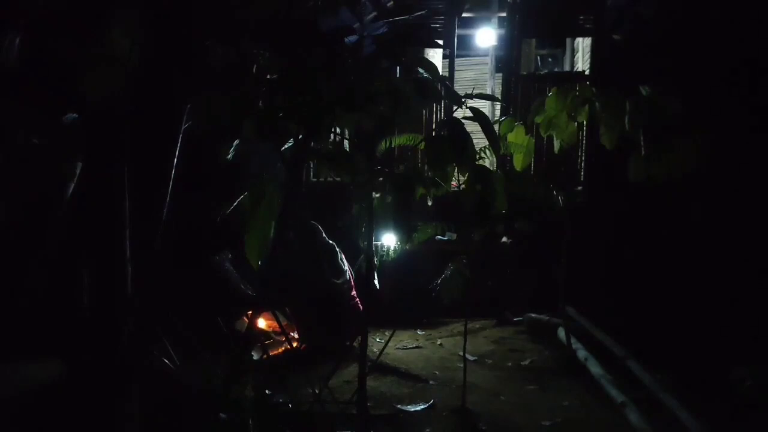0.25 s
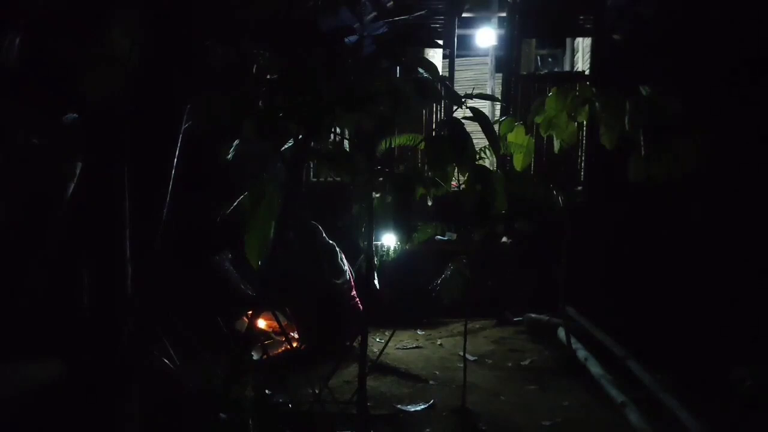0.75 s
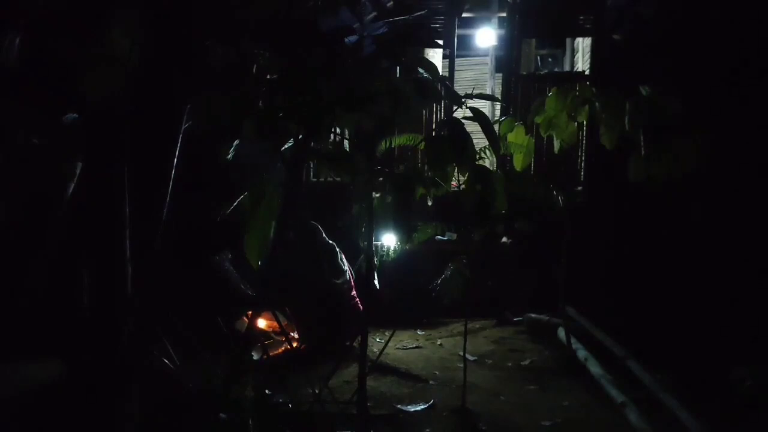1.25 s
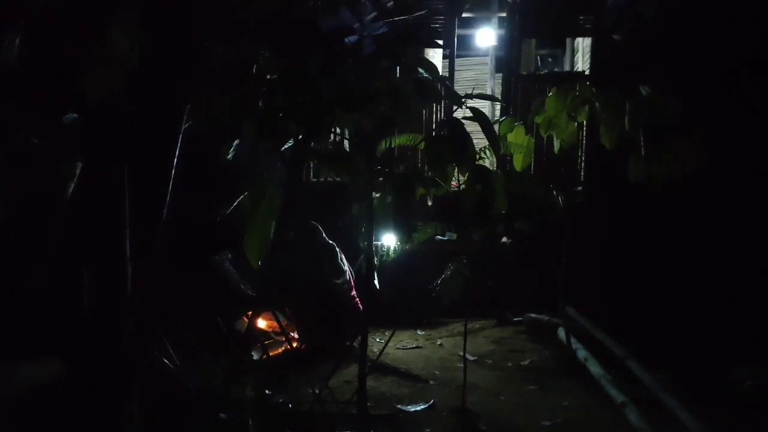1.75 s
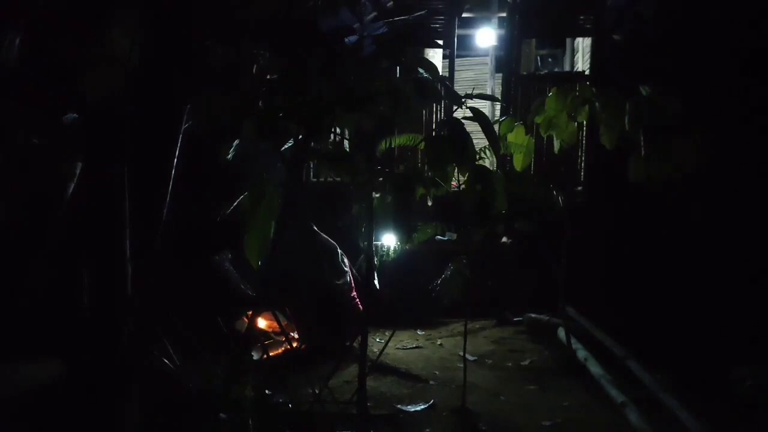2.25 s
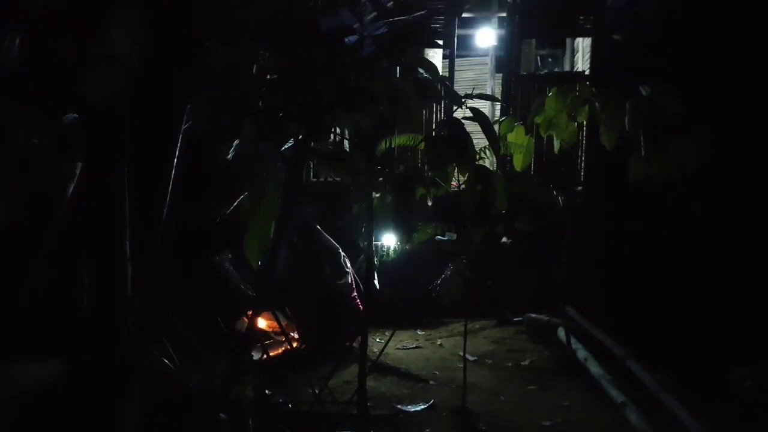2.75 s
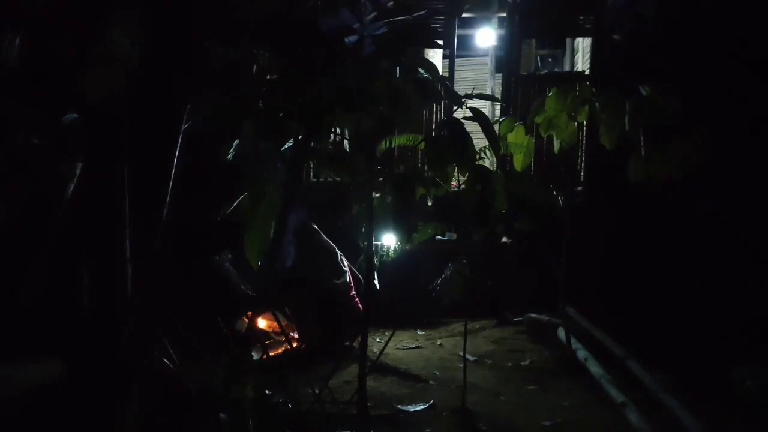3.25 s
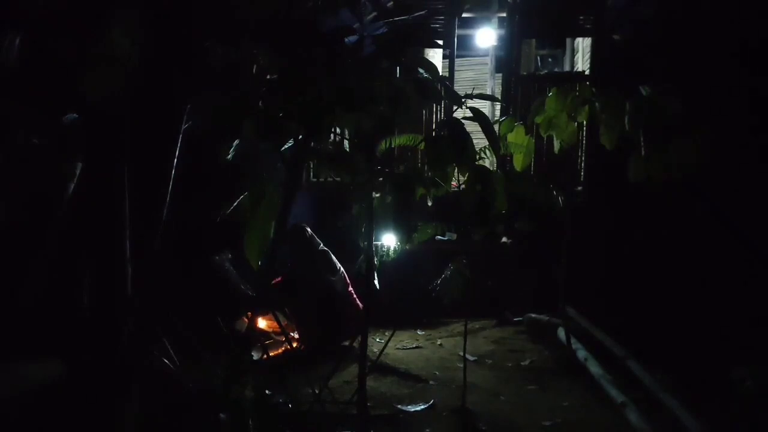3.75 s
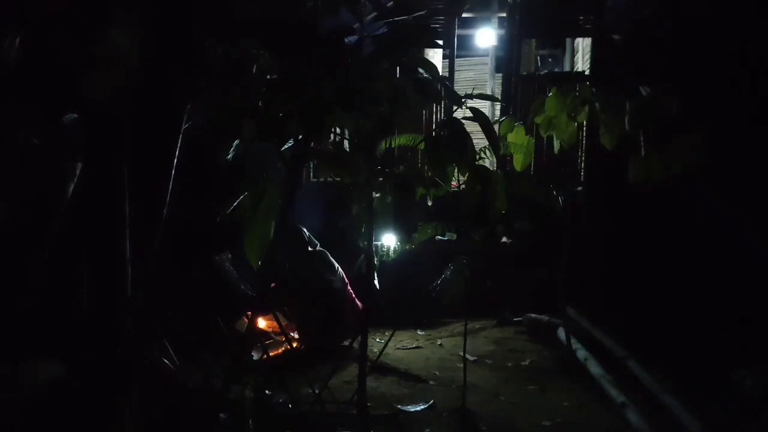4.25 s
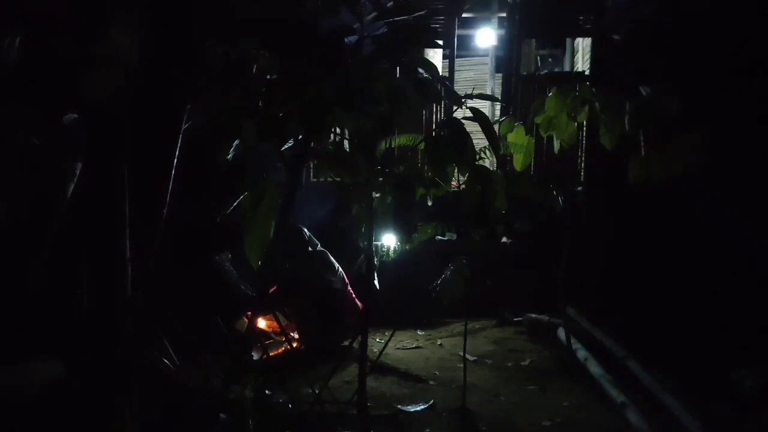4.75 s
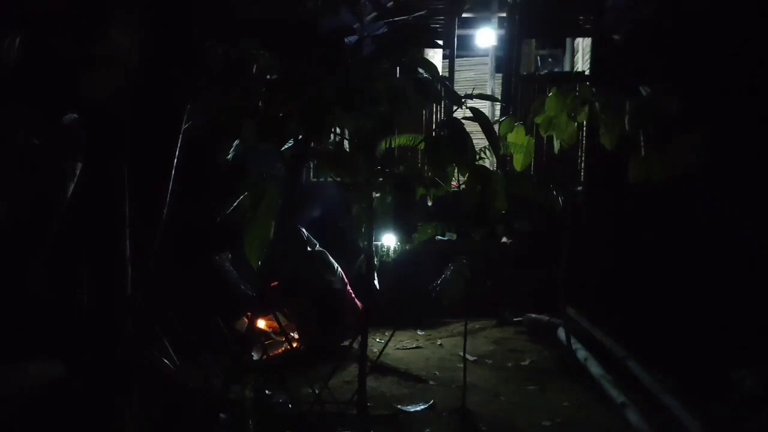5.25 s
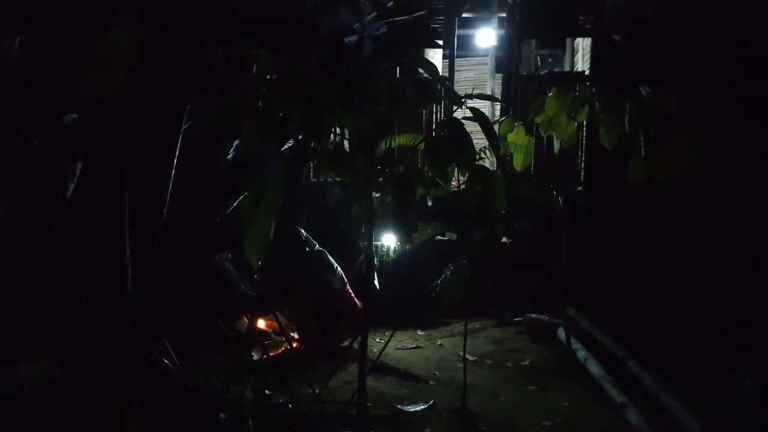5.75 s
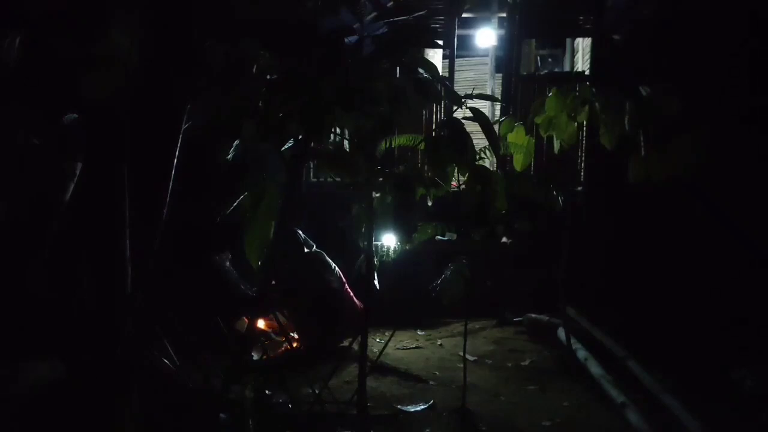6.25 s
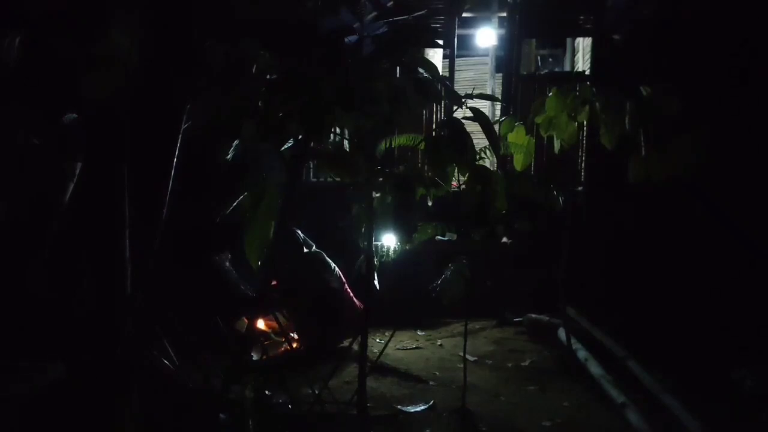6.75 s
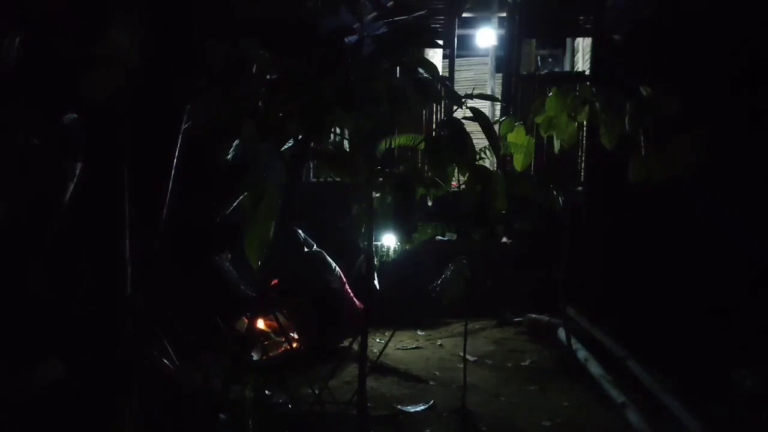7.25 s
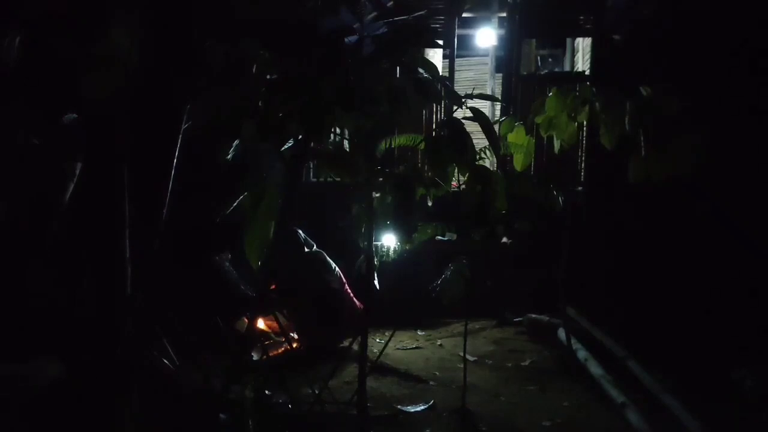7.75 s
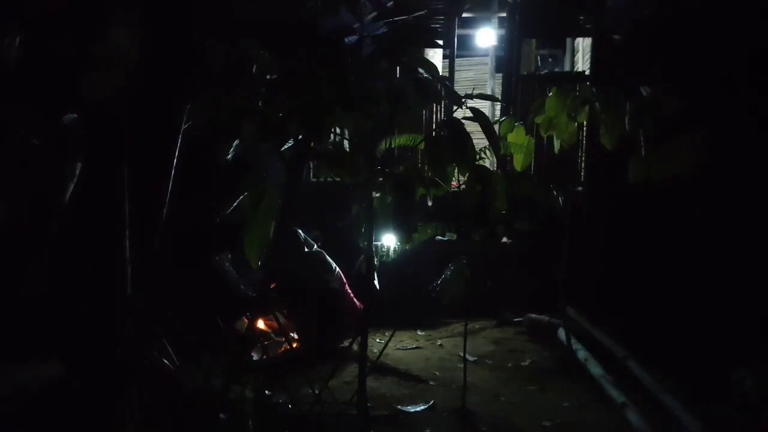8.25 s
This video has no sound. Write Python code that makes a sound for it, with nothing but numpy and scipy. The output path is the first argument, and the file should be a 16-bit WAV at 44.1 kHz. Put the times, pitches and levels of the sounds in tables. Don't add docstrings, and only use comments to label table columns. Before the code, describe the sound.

A leafy yard at night, heard in stereo. Throughout, two field crickets a few metres to the right sing around 5.3 kHz, each repeating chirps of two or three very short falling strokes roughly every 0.2 seconds. They overlap and slip against each other; one rests from about 4.3 to 5.5, the other pauses from 0.4 to 1.0 and 7.6 to 8.3. Weaker neighbours fill gaps. Behind, steady trills shimmer, strongest near 4.6 and 5.7 kHz, with distant crickets and soft air hiss. Very faint rubs occur near 0 and 1.1. Hollow fingertip taps and short rubs begin around 4.1, with clear knocks near 4.8, 5.15 and the sharpest at 6.4, then a loose cluster of taps and rubbing from 7.2 to 8.2. Tiny dry twig ticks are scattered, clearest at 5.15 and 8.2. Leaves rustle very softly after 6.5, fullest near 8.1.

```python
import sys
import numpy as np
from scipy import signal
from scipy.fft import rfft, irfft
from scipy.io import wavfile
from scipy.ndimage import uniform_filter1d

SR = 44100
rng = np.random.default_rng(int(sys.argv[2]) if len(sys.argv) > 2 else 0)


def materialize(psi):
    bounded = np.clip(np.atleast_2d(psi).T, -1, 1)
    quanta = np.round(bounded * 32767).astype(np.int16)
    wavfile.write(sys.argv[1], SR, quanta)


def amp(db):
    return 10 ** (np.asarray(db, float) / 20)


N = 374409

# (frequency [Hz], density [dB per Hz])
AIR_SPECTRUM = [(20, 1), (60, -8.5), (160, -8.5), (350, -16.5), (700, -17), (1300, -14), (2200, -14),
                (3450, -10), (3750, -3.5), (4200, -4.5), (5500, -1), (6050, -14), (7200, -14), (9200, -16),
                (10500, -18.5), (15500, -25)]
AIR_DB = -52
# (time [s], level [dB])
RUSTLE_SWELL = [
    (5.5, -101),
    (6.5, -72.5),
    (7.2, -61),
    (8.1, -58),
    (8.6, -61.5),
]
# (wing pitch [Hz], spread [Hz], fall in a stroke [Hz], strokes [per s], level [dB],
# left minus right [dB])
TRILLS = [
    (1817, 176, 470, 45, -77, 24),
    (2817.5, 77, 219, 52, -61, -0.5),
    (3291, 40, 60, 38, -74.5, -4),
    (4193, 80, 240, 43, -61, -3.5),
    (4630, 122.6, 303, 36, -45.5, -1.5),
    (6450, 33, 96, 7.7, -71.5, 5.5),
    (6746, 86, 95, 43, -67, -6),
    (7200, 84, 220, 21, -70, 2),
    (7500, 200, 210, 50, -69, 0),
    (8910, 230, 720, 54, -74.5, 8),
]
TREE_CRICKETS = (5706, 13, 78, 40, -53, 3.5)
# (time [s], peak level [dB])
TWIG_TICKS = [
    (0.9248, -59),
    (2.3795, -58),
    (3.7389, -52),
    (5.1514, -45),
    (5.8775, -54),
    (6.2913, -58),
    (6.415, -51),
    (8.1638, -48),
    (8.315, -50),
]
# (time [s], peak level [dB], low modes [dB], middle modes [dB], upper modes [dB]),
# the modes against the peak
TAPS = [(0.034, -62, 17, -16, -14.5), (4.14, -48, 13, 7.5, -7), (4.173, -45.5, 2, -4, -17),
        (4.421, -42, -8, -11.5, -23), (4.77, -37, -15, 0.5, -10), (4.8, -49, -12, -4, -7),
        (4.858, -52.5, 6, -20, -22), (4.92, -56, -9, -15, -20), (5.151, -30, -29, -1, -10.5),
        (5.175, -52, -15, -14, 2), (5.197, -59, -15, -7, 4), (5.238, -58.5, -15, -1, 2),
        (6.416, -25.5, -11, -15.5, -26.5), (6.444, -67, -20, -20, -22), (6.837, -48, -22, -10, -24),
        (7.187, -57, -28, -19, -15), (7.198, -50.5, -22, -23, -35), (7.328, -68, -15, 2, -13),
        (7.36, -66, -15, -9, -17), (7.417, -49, -28, -18, -11), (7.545, -39.5, -25, -16, -34),
        (7.595, -34.5, -7, -22, -23), (7.656, -47, -17, -16, -18), (7.677, -47, -15, -13, -17),
        (7.694, -63, -15, 10.5, -20), (7.787, -44, 9.5, -13, -15), (7.856, -43.5, 5.5, -15, -19),
        (7.927, -59, -15, -13, -22), (8.001, -65, -15, -15, -15), (8.094, -60, -20, -15, -4),
        (8.143, -51, -16, -16, -16), (8.189, -52.5, -18, -15, -5), (8.2, -39, -28, -7.5, -24)]
# (time [s], hold [s], level [dB])
RUBS = [(0.032, 0.056, -61), (1.065, 0.099, -66), (1.207, 0.069, -72), (4.18, 0.017, -49),
        (4.274, 0.022, -59.5), (4.323, 0.008, -50), (4.355, 0.007, -52), (4.402, 0.0066, -60),
        (4.436, .01, -64.5), (4.813, 0.017, -53.5), (4.861, 0.014, -63), (5.19, .008, -65),
        (5.25, 0.011, -64), (6.43, 0.0073, -63), (6.503, 0.022, -68), (7.245, 0.02, -65.5),
        (7.34, 0.12, -62.5), (7.512, 0.063, -62), (7.625, .02, -62), (7.709, 0.05, -58.5),
        (7.783, 0.049, -54.5), (7.877, 0.045, -60), (7.998, 0.09, -60), (8.113, 0.074, -59),
        (8.2, 0.035, -54.5)]
RUB_RISE_DB_PER_S, RUB_FADE_DB_PER_S = 1200, 696
# (frequency [Hz], level [dB], t60 [s])
MOUNT_LOW = [(453, -19, 0.045), (514, -19.5, 0.051), (606, -42, 0.05), (857, -9, 0.067), (913, -14, 0.048),
             (1058, 3.5, 0.014), (1180, -7, 0.023)]
MOUNT_HIGH = [(1504, -5, 0.021), (1750, 7, 0.025), (1923, 3.5, 0.034), (2140, -1.5, 0.019),
              (2380, -2, 0.044), (2750, 11, 0.021), (3184, 5, 0.044)]
THUD = [(680, -62, 0.004), (1340, -19.5, 0.0087), (2080, -15.5, 0.0069)]
GRIPS = [(802, -13.5, 0.05), (844, -4, 0.072), (950, -7, 0.027)]
# (time [s], strokes [count], peak level [dB])
NEIGHBOURS = [(0.08, 1, -37), (0.146, 1, -37), (0.217, 3, -37), (0.425, 1, -36), (0.576, 4, -36),
              (0.857, 1, -34), (1.175, 1, -33), (1.282, 1, -33), (1.381, 1, -33), (1.586, 1, -33),
              (1.73, 3, -36), (1.887, 2, -35), (1.992, 1, -33), (2.177, 2, -34), (2.529, 2, -35),
              (2.836, 1, -34), (2.954, 2, -35), (3.135, 1, -32), (4.35, 1, -36), (4.669, 2, -37),
              (4.757, 1, -28), (4.854, 4, -36), (5.068, 3, -36), (5.285, 2, -37), (5.495, 3, -35),
              (5.918, 3, -37), (7.551, 2, -37), (7.682, 3, -38), (7.859, 2, -37), (8.075, 2, -36)]
# (time [s], first stroke [dB], second stroke [dB], third stroke [dB])
CHIRPS_A = [(0.717, -27.5, -27, -29), (0.99, -28, -31, -32), (1.221, -25.5, -26, -50),
            (1.416, -27.5, -28, -27), (1.644, -26.5, -31, -51), (1.841, -27, -29.5, -49),
            (2.037, -31, -31, -27), (2.272, -27.5, -29, -51), (2.467, -27, -25.5, -46),
            (2.664, -27.5, -25, -28.5), (2.893, -29.5, -27, -46), (3.089, -28, -26.5, -48),
            (3.286, -28, -29, -26), (3.515, -29, -26.5, -40), (3.716, -28, -29, -45),
            (3.914, -27, -25, -36), (4.153, -31, -29.5, -53), (5.513, -30.5, -29.5, -30),
            (5.713, -26.5, -27.5, -28), (5.943, -27.5, -29, -46), (6.141, -27.5, -25.5, -28),
            (6.372, -26.5, -30, -34), (6.569, -28, -26.5, -43), (6.769, -26.5, -26.5, -43),
            (6.967, -26.5, -27.5, -47), (7.164, -27, -26, -27), (7.395, -25, -28.5, -29.5),
            (7.593, -28, -30.5, -51), (7.791, -30.5, -28.5, -50), (7.99, -30, -27.5, -29.5)]
CHIRPS_B = [(0.034, -28, -27, -47), (0.239, -25, -25.5, -40), (1.003, -25, -27, -27.5),
            (1.21, -30, -26.5, -51), (1.416, -29, -26, -34), (1.62, -28, -25, -45),
            (1.824, -27.5, -25, -42), (2.026, -27, -21.5, -47), (2.229, -28, -27.5, -47),
            (2.435, -33, -33, -41), (2.631, -35, -28, -25), (2.871, -29, -26, -27), (3.168, -27, -25, -51),
            (3.372, -30, -25.5, -36), (3.575, -38, -30, -53), (3.778, -29, -26.5, -42),
            (3.981, -29, -33.5, -44), (4.183, -24, -35, -54), (4.385, -27, -25, -58),
            (4.587, -31, -23.5, -36), (4.789, -30, -26, -54), (4.993, -28.5, -40, -38),
            (5.163, -28, -26.5, -47), (5.366, -25, -32, -35), (5.602, -28, -29, -45),
            (5.804, -37, -29, -33), (6.006, -32, -30, -37), (6.209, -25, -44, -40), (6.406, -29, -36, -30),
            (6.644, -31, -29, -44), (6.848, -31, -25.5, -32), (7.051, -31, -32, -41),
            (7.253, -41, -29.5, -28.5), (7.489, -26, -29.5, -43), (8.297, -27, -29.5, -26)]
LEFT_LAG_S = (.000475, .00048, .00047)
# (frequency [Hz], margin [dB])
GATE_MARGIN = [(200, 20), (1100, 20), (1500, 6), (2300, 6), (3050, 5), (3450, 1.5), (3900, 2.5), (4200, 6),
               (5300, 9), (5480, 1), (5700, 9), (6150, 0), (6500, 1.5), (7800, 0), (8600, 2), (9500, -.5),
               (10500, -1), (13000, -1.5), (14300, 2), (14900, 0), (15400, -2.5)]

YARD_T60_S = 0.31
FIRST_RETURN_S, WALL_ECHO_S, GROUND_ECHO_S = 0.008, 0.0093, 0.0052
FENCE_S, FENCE_SCATTER_S, FENCE_DB = 0.015, 0.0043, -10.5
STROKE_PEAK = 0.45
STROKE_GAP_A_S, STROKE_GAP_B_S, STROKE_LEAD_S = 0.0342, 0.0322, 0.001
CRESCENDO_DB, STROKE_SCATTER_DB = 1.1, 0.1


def level(x, db):
    return x * amp(db) / np.sqrt(np.mean(x ** 2) + 1e-30)


def curve(rows):
    s, db = np.transpose(rows)
    t = np.arange(N) / SR
    return amp(np.interp(t, s, db)) * np.clip(np.minimum(t - s[0], s[-1] - t) / 0.0088, 0, 1)


def walk(rate):
    k = int(SR / rate)
    held = np.repeat(rng.standard_normal(N // k + 1), k)
    return uniform_filter1d(uniform_filter1d(held, k), k)[:N]


def filtered(x, order, hz, kind):
    return signal.sosfilt(signal.butter(order, hz, kind, fs=SR, output="sos"), x)


def scatter(at, bursts):
    return np.bincount(at.ravel(), bursts.ravel(), N)[:N]


def yard(x, t60_s, delay_s):
    t = np.arange(SR) / SR
    tail = rng.standard_normal((2, SR)) * amp(-60 * t / t60_s) * np.clip(t / delay_s, 0, 1) ** 2
    tail = tail / np.sqrt(np.sum(tail ** 2, axis=1, keepdims=True))
    return irfft(rfft(x) * rfft(tail, N), N)


def strokes(s, db, hz, fall_hz, length_s, peak=0.35, third_db=-99.0, lag_s=0.0, pan_db=0.0, scatter_hz=0.0):
    chance = rng.standard_normal((len(s), 4)).T[:, :, None]
    hz = hz + scatter_hz * chance[3]
    length = length_s * (1 + 0.12 * chance[0])
    fall = fall_hz * (1 + 0.1504 * chance[1])
    out = np.zeros((2, N))
    for ear, side in enumerate((1, -1)):
        start = (s[:, None] + lag_s * (1 - ear)) * SR
        at = start.astype(int) + np.arange(int(length.max() * SR) + 2)
        t = (at - start) / SR
        u = np.clip(t / length, 0, 1)
        swell = np.sin(np.pi * u ** (np.log(0.5) / np.log(peak))) ** 1.5
        phase = 2 * np.pi * (hz * t - fall * t * u / 2) + 10 * chance[2]
        tone = np.sin(phase) + amp(third_db) * np.sin(3 * phase)
        out[ear] = scatter(at, swell * tone * amp(db + side * pan_db / 2))
    return out


def air():
    f = np.arange(N // 2 + 1) * SR / N + 1
    hz, db = np.transpose(AIR_SPECTRUM)
    spectrum = rfft(rng.standard_normal((2, N))) * amp(np.interp(np.log(f), np.log(hz), db))
    octave = np.log2(f / 20).astype(int)
    out = 0
    for k in range(11):
        flicker_db = (2.0 * walk(6) + 1.5 * walk(14)) * (1 if k < 8 else 0.4)
        out = out + irfft(spectrum * (octave == k), N) * amp(flicker_db)
    return level(out, AIR_DB)


def rustle():
    noise = rng.standard_normal((2, N))
    body = filtered(noise, 2, [2200, 3400], "bandpass")
    hiss = filtered(noise, 1, [6000, 13500], "bandpass")
    return (level(body, 0) + level(hiss, -2.5)) * amp(2.2 * walk(15)) * curve(RUSTLE_SWELL)


def trill(hz, spread_hz, fall_hz, rate, db, pan_db, count=6, swell_db=3.5):
    out = 0
    for pitch, (pace, place) in zip(np.linspace(-1.5, 1.5, count), rng.standard_normal((count, 2))):
        gaps = (1 + 0.04 * pace + 0.03 * rng.standard_normal(int(N / SR * 100))) / rate
        s = np.cumsum(gaps)
        s = s[s < N / SR]
        effort_db = swell_db * walk(4)[(s * SR).astype(int), None]
        out = out + strokes(s, effort_db, hz + spread_hz * pitch, fall_hz, 0.699 / rate, peak=0.37,
                            lag_s=0.0003035 * abs(place), pan_db=2.0 * place)
    far = 0.7 * out + yard(out, YARD_T60_S, 0.013)
    return level(far, db) * amp(np.array([[pan_db], [-pan_db]]) / 2)


def far_crickets(count):
    out = 0
    for pace, pitch, place, start in rng.random((count, 4)):
        gaps = 0.19 + 0.044 * pace + 0.01 * rng.standard_normal(int(N / SR * 6))
        chirps = start / 5 + np.cumsum(gaps) - 0.3
        s = (chirps[:, None] + 0.039 * np.arange(3)).ravel()
        s = s[(s > 0) & (s < N / SR)]
        out = out + strokes(s, 0, 5100 + 280 * pitch, 879.6, 0.02528, peak=STROKE_PEAK,
                            third_db=-39, pan_db=20 * place - 13)
    return level(amp(-4.0) * out + yard(out, YARD_T60_S, FIRST_RETURN_S), -43.5)


def ticks():
    s, db = np.transpose(TWIG_TICKS)
    since = np.arange(SR // 50) / SR
    snap = rng.standard_normal((2, len(s), len(since))) * amp(db[:, None] + 0.5 - 60 * since / 0.023)
    spots = (s * SR).astype(int)[:, None] + np.arange(len(since))
    out = np.array([scatter(spots, ear) for ear in snap])
    return filtered(out, 2, [5800, 12000], "bandpass")


def ring(modes, push):
    t = np.arange(SR // 4) / SR
    body = sum(amp(db - 60 * t / t60) * np.sin(2 * np.pi * hz * t) for hz, db, t60 in modes)
    return signal.fftconvolve(push, body)[:N]


def tapping():
    s, db, low_db, mid_db, high_db = np.transpose(TAPS)
    groups = [(MOUNT_LOW[:3], low_db + 1), (MOUNT_LOW[3:4], 3), (MOUNT_LOW[4:], mid_db),
              (MOUNT_HIGH, high_db - 3.5), (THUD, mid_db)]
    since = np.arange(SR // 16) / SR
    decay = amp(-21.5 - 60 * since / 0.021) + amp(-30.5 - 60 * since / 0.1)
    blow = rng.standard_normal((len(s), len(since))) * decay
    blow[:, 0] = 1
    spots = (s * SR).astype(int)[:, None] + np.arange(len(since))
    taps = sum(ring(modes, scatter(spots, blow * amp(db + share_db)[:, None])) for modes, share_db in groups)
    return filtered(taps, 2, 2600, "lowpass")


def rubbing():
    t = np.arange(N) / SR
    pressure = 0
    for s, hold_s, db in RUBS:
        rise_db = RUB_RISE_DB_PER_S * np.clip(s - t, 0, 1)
        fade_db = RUB_FADE_DB_PER_S * np.clip(t - s - hold_s, 0, 1)
        pressure = pressure + amp(db - rise_db - fade_db)
    slips = [(rng.random(N) < 0.01) * rng.standard_normal(N) * amp(6.0 * walk(45)) for _ in GRIPS]
    rub = sum(ring([grip], push) for grip, push in zip(GRIPS, slips))
    rub = rub + amp(-10.5) * ring(MOUNT_LOW, slips[0])
    return level(rub, -1.2) * pressure


def mount():
    direct = filtered(tapping() + rubbing(), 4, 420, "highpass")
    both = direct * amp(np.array([[0.6], [-0.6]]))
    return both + amp(-9) * yard(both, 0.08, 0.006)


def rasp(near):
    effort = uniform_filter1d(np.abs(near).sum(axis=0), size=SR // 14)
    hiss = filtered(rng.standard_normal((2, N)), 3, [13800, 15400], "bandpass")
    return level(hiss * np.abs(effort) ** 2.0, -76.5)


def answering_strokes():
    rows = np.array([(s + k * STROKE_GAP_B_S, db + CRESCENDO_DB * (k - 0.5))
                     for s, count, db in NEIGHBOURS for k in range(count)])
    return rows + [0, STROKE_SCATTER_DB] * rng.standard_normal((len(rows), 1))


def fence_strokes(near_strokes):
    rows = near_strokes + [FENCE_S, FENCE_DB]
    return rows + [FENCE_SCATTER_S, STROKE_SCATTER_DB] * rng.standard_normal(rows.shape)


def chirp_strokes(chirps, gap_s):
    return np.array([(s + k * gap_s - STROKE_LEAD_S, db) for s, *row in chirps for k, db in enumerate(row)])


def near_cricket(rows, lag_s, pan_db, hz, fall_hz, length_s):
    s, db = np.transpose(rows)
    song = strokes(s, db[:, None], hz, fall_hz, length_s, peak=STROKE_PEAK, third_db=-47,
                   lag_s=lag_s, pan_db=pan_db, scatter_hz=44.7)
    song = song * amp(2.2 * walk(250))
    wall = amp(-10) * np.roll(song[::-1], int(WALL_ECHO_S * SR), axis=1)
    ground = amp(-12.5) * np.roll(song, int(GROUND_ECHO_S * SR), axis=1)
    return song + wall + ground


def scene():
    background = air() + rustle() + sum(trill(*row) for row in TRILLS)
    background = background + trill(*TREE_CRICKETS, count=3, swell_db=1.5) + far_crickets(count=7)
    song_a = chirp_strokes(CHIRPS_A, STROKE_GAP_A_S)
    song_b = chirp_strokes(CHIRPS_B, STROKE_GAP_B_S)
    other_songs = np.vstack([answering_strokes(), fence_strokes(np.vstack([song_a, song_b]))])
    lag_a, lag_b, lag_others = LEFT_LAG_S
    a = near_cricket(song_a, lag_a, pan_db=-13.5, hz=5265, fall_hz=793, length_s=0.01877)
    b = near_cricket(song_b, lag_b, pan_db=-8, hz=5308, fall_hz=642, length_s=0.0169)
    others = near_cricket(other_songs, lag_others, pan_db=-9.5, hz=5290, fall_hz=824, length_s=0.02)
    near = amp(-3.0) * (a + b) + amp(-3.5) * others
    returns = amp(-14) * sum(yard(v[1:], YARD_T60_S, FIRST_RETURN_S) for v in (a, b, others))
    return background + ticks() + mount() + rasp(near) + returns + near


def gate(x):
    shift = 1024 - 958
    f, _, z = signal.stft(np.pad(x, ((0, 0), (shift, 0))), SR, "cosine", 2048, 1024)
    start = np.r_[0:448:6, 448:len(f):10]
    width = np.diff(np.r_[start, len(f)])
    power = np.add.reduceat(np.sum(np.abs(z) ** 2, axis=0), start, axis=0) / width[:, None]
    db = 10 * np.log10(power + 1e-20)
    around = uniform_filter1d(db, size=9, axis=0)
    hz, margin_db = np.transpose(GATE_MARGIN)
    wander_db = 4.0 * uniform_filter1d(rng.standard_normal(db.shape), size=3, axis=1)
    kept = db > around - np.interp(f[start], hz, margin_db)[:, None] + wander_db
    z = z * np.repeat(kept, width, axis=0)[:len(f)]
    return signal.istft(z, SR, "cosine", 2048, 1024)[1][:, shift:shift + N]


def band_limit(x):
    return signal.sosfilt(signal.butter(12, 15500, fs=SR, output="sos"), x)


def record(dry):
    mix = gate(dry)
    return band_limit(mix)


dry = scene()
out = record(dry)
materialize(out)
```